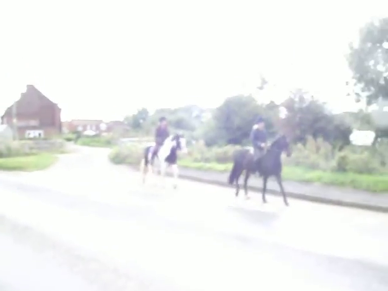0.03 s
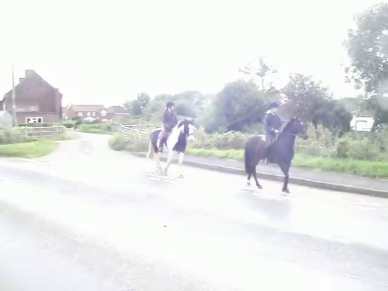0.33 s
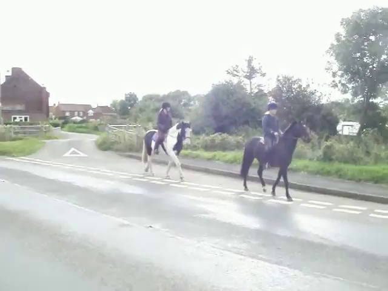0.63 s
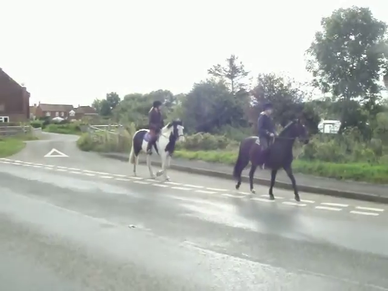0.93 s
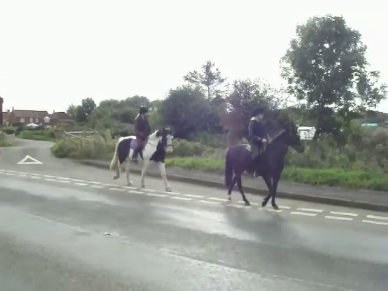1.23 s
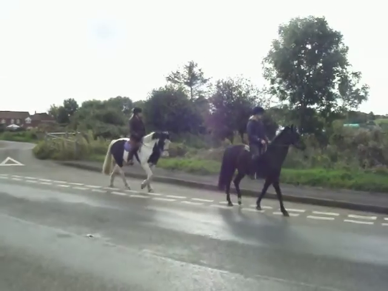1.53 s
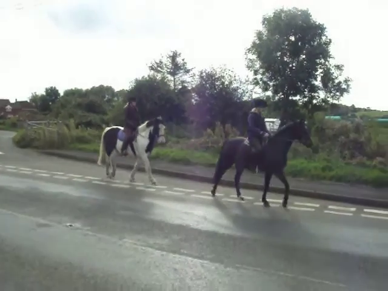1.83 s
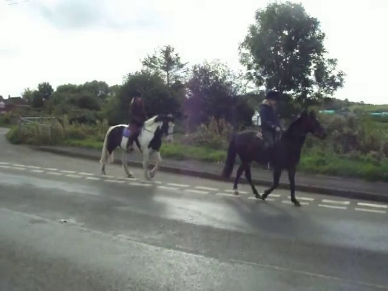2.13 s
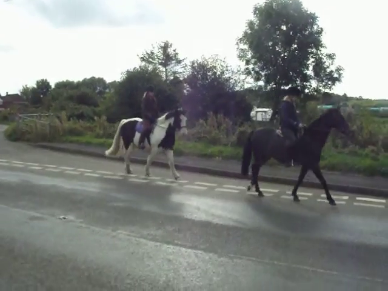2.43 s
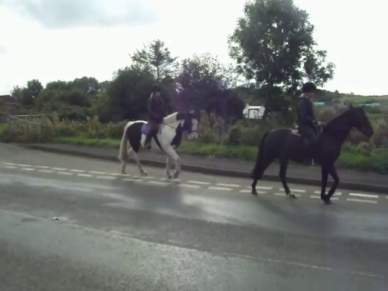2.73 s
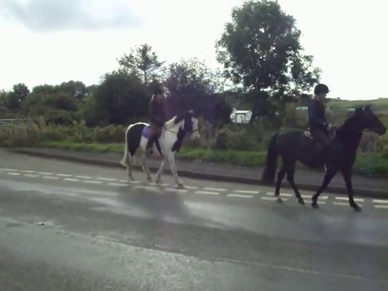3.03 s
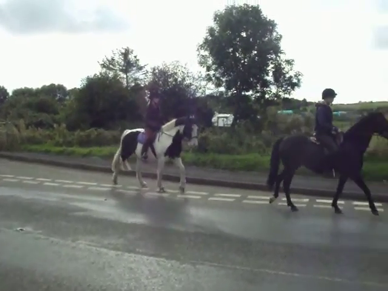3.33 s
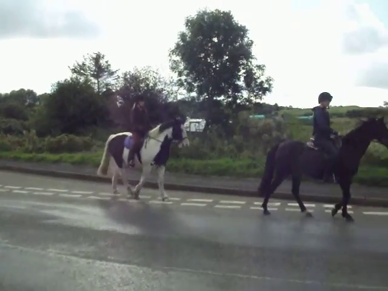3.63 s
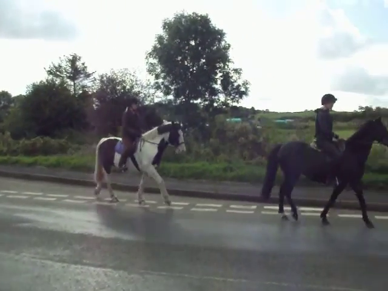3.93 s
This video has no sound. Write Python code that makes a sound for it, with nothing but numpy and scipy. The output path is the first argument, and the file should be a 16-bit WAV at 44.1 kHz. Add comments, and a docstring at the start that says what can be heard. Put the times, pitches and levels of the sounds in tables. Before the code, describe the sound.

Two horses' hooves clop lightly on a paved road a few metres away, about four or five uneven, gritty steps a second throughout. Sharp handling clicks and short rubs sound close to the microphone at the start, around 0.5 seconds and loudest near 1.35 seconds. Light wind rumbles, with soft bumps between 1.3 and 2 seconds. A steady outdoor hiss lies behind, easing slightly toward the end at 4 seconds.

```python
"""A wet paved road, with two horses walking a few metres from a small hand-held camera's microphone.
Each hoof lands toe first: the hollow under it rings with a clop and the shoe cracks on grit.
Early on, sharp little clicks and rubs sound close by, probably fingers shifting on the camera's case.
Behind them lie steady outdoor noise and light wind on the microphone."""
import sys
import numpy as np
from scipy import signal
from scipy.fft import rfft, irfft, next_fast_len
from scipy.io import wavfile

SR = 44100
rng = np.random.default_rng(int(sys.argv[2]) if len(sys.argv) > 2 else 0)


def dump_mix(stems):
    """Bounce the given channels to the path in sys.argv[1] as a 16-bit WAV at rate SR."""
    frames = np.atleast_2d(stems).T  # one column per channel
    limited = np.clip(frames, -1, 1)  # hard clip at full scale
    pcm = np.round(limited * 32767).astype(np.int16)
    wavfile.write(sys.argv[1], SR, pcm)


N = 176400
EVENT_SIZE = 8192   # samples in one hoof fall or click


def hooves():
    """A few metres off, toe, sole and heel land in turn; road and hedge throw some of the sound back."""
    # Each row: sole contact in seconds, relative clop level in dB, hollow pitch in Hz, relative crack
    # level in dB, hollow t60 in seconds, heel delay in seconds, heel and toe in dB against the sole.
    hoof_falls = [(0.2015, -18, 797, -16.5, 0.019, 0.0067, -8.5, -2),
                  (.4677, -19.5, 760, -10.5, 0.028, .0055, -13, -30),
                  (0.7453, -27, 900, -23.5, 0.019, .005, -7, -5),
                  (1.012, -25, 750, -23, 0.019, 0.0027, -3, -3),
                  (1.049, -16.5, 1500, -15.5, .010, 0.0074, 1, -30),
                  (1.2813, -23, 912, -13.5, 0.044, .0056, -5, -13),
                  (1.542, -29, 995, -34, 0.014, 0.0035, -3.5, -7),
                  (1.725, -22.5, 1125, -23.5, .015, 0.0041, -11, -9),
                  (1.8105, -20, 923, -32.5, 0.019, .0055, -14.5, -19.5),
                  (2.026, -43, 950, -22, 0.011, 0.0033, -8, -28),
                  (2.082, -13.5, 724, -15.5, 0.015, .006, -14, -11),
                  (2.362, -25.5, 1090, -27, 0.012, 0.014, -1.5, -10),
                  (2.667, -38, 860, -21.5, 0.01, 0.0023, -8, -18),
                  (2.915, -20, 910, -30, 0.018, 0.0054, -3.5, -27),
                  (2.966, -37, 800, -27.5, 0.0089, 0.0027, -2, -18),
                  (3.126, -41, 1620, -25, .01, 0.016, -1, -28),
                  (3.1792, -25, 680, -19, 0.034, .005, 0, -12),
                  (3.477, -14, 900, -19, 0.028, .0056, -8, -12),
                  (3.621, -22.5, 953, -24.5, 0.0064, 0.0043, -15, -10),
                  (3.745, -23.5, 530, -25, 0.0078, 0.0052, -11, -15)]
    toe_lead_s, grit_t60_s = .0048, .033
    scatter_db, scatter_t60_s = -11.5, .062
    out = np.zeros(N)
    for s, clop_db, hz, crack_db, t60, heel_s, heel_db, toe_db in hoof_falls:
        toe = from_db(toe_db) * tap(0)
        heel = from_db(heel_db) * tap(toe_lead_s + heel_s)
        contacts = toe + tap(toe_lead_s) + heel
        grit = np.roll(dying_noise(grit_t60_s), int(toe_lead_s * SR))
        step = from_db(clop_db + .5) * hollow_clop(contacts, grit, hz, t60)
        step += from_db(crack_db + 2.5) * shoe_crack(contacts, grit)
        scatter = signal.fftconvolve(step, dying_noise(scatter_t60_s))[:EVENT_SIZE]
        add(out, s - toe_lead_s, from_db(scatter_db) * scatter - step)
    return out


def hollow_clop(contacts, grit, hz, t60):
    """The hollow under the hoof rings in two modes and radiates little treble."""
    force = contacts + from_db(-6) * grit
    hollow = ring(force, hz, t60) + from_db(-9) * ring(force, hz * 1.18, t60=.015)
    radiated = np.diff(hollow, prepend=0) * SR / (2 * np.pi * hz)
    return lowpass(radiated, hz=1500)


def shoe_crack(contacts, grit):
    """The shoe strikes the tarmac and crushes grit."""
    # Spectrum of the strike. Each row: frequency in Hz, relative level in dB.
    spectrum = [(100, -10.5), (330, -1.5), (520, -9), (800, -2.5), (1400, 1.5), (2100, -1.5), (2750, 2),
                (3200, -5.5), (3750, -24), (5500, -36)]
    tap_peak = np.abs(colour(tap(0), spectrum)).max()
    return colour(contacts + from_db(-2) * grit, spectrum) / tap_peak


def case_clicks():
    """Right by the microphone, each slip of a finger snaps the case, with a dull thud and a short rub."""
    # Each row: start in seconds, relative level in dB, pitch as a ratio, gain of the low modes in dB.
    clicks = [(.001, -6.5, 1, -29), (.0048, -4.5, 0.87, -9.5), (.0085, -11.5, 1, -1.5),
              (0.015, -16, 0.9, -12), (0.017, -26, 1.14, -11), (0.067, -22, 1, -10),
              (0.097, -27.5, 0.93, 3), (.362, -21, 0.87, -2), (0.5007, -9, 1.01, -8),
              (0.5979, -17, 1.09, -4), (.611, -18, 0.95, 5.5), (0.629, -23, 0.87, 5),
              (0.646, -20, 1.15, -6), (.658, -16, 1.06, 1), (0.871, -23, 0.97, 2), (.894, -21, 1.15, -7),
              (1.244, -20, 1, 2), (1.250, -22, 1.2, 9.5), (1.347, -1.5, 1.007, -2), (1.361, -15, 1, 0),
              (1.366, -16, 1, 1.5), (1.385, -13, .92, -2.5), (1.3914, -10, .98, 1.5),
              (1.4054, -15, 1.26, 3)]
    rub_db, thud_db, thud_hz = -11, -16, 450
    out = np.zeros(N)
    for s, db, pitch, low_db in clicks:
        force = tap(0) + from_db(rub_db) * dying_noise(t60=.02)
        thud = from_db(thud_db) * signal.lfilter([1], [1, -np.exp(-2 * np.pi * thud_hz / SR)], force)
        add(out, s, from_db(db + 3.5) * (case_ring(force, pitch, low_db) + thud))
    return out


def case_slides():
    """Sliding fingers feed tiny uneven slips into the case's modes and rumble through its body."""
    # Each row: start in seconds, length in seconds, friction level in dB.
    slides = [(0, 0.12, -39.5), (0.581, 0.082, -36), (1.225, 0.032, -34), (1.297, 0.11, -34)]
    slips = rng.standard_normal(N) ** 3
    friction = rms_one(case_ring(slips, pitch=1.063, low_db=.5))
    rumble = rms_one(lowpass(rng.standard_normal(N), hz=357))
    envelope = np.zeros(N)
    for s, length, db in slides:
        add(envelope, s, from_db(db) * signal.windows.tukey(int(length * SR), .5))
    return envelope * (friction + from_db(-6) * rumble)


def case_ring(force, pitch, low_db):
    """The small plastic case rings in a few short modes of alternating sign."""
    # Each row: frequency in Hz at a pitch ratio of 1, relative level in dB, t60 in seconds.
    modes = [(1030, -17.5, 0.013), (1502, -13, 0.028), (1900, -12.5, 0.024), (2663, -3.5, .013),
             (2868, -6.5, 0.013), (3130, -11.5, 0.01), (4170, -21.5, 0.0069), (4700, -24.5, 0.0064)]
    low_below_hz = 2200
    out = np.zeros(len(force))
    for k, (hz, db, t60) in enumerate(modes):
        gain = from_db(db + low_db * (hz < low_below_hz))
        out += (-1) ** k * gain * ring(force, hz * pitch, t60)
    return out


def outdoor_noise():
    """A broad background hiss flickers and slowly sinks; a faint narrow band whines steadily in it."""
    # Spectrum of the hiss. Each row: frequency in Hz, relative density in dB.
    spectrum = [(50, -20), (120, -3), (270, -3), (480, -5.5), (720, -5.5), (880, -0.5), (1100, -5),
                (1350, -2), (1680, -4.5), (1870, -4), (2030, -8.5), (2270, -11.5), (2430, -2.5), (2750, -7),
                (3000, -7), (3600, -15.5), (4050, -18), (4600, -16.5), (5100, -20), (5800, -23)]
    # Course of the hiss. Each row: time in seconds, level in dB.
    levels = [(0, -35), (.3, -36.5), (.8, -36.5), (1.3, -36), (1.55, -37), (2.4, -37.5), (3.1, -39),
              (3.65, -38.5), (4, -39)]
    whine_hz, whine_width_hz, whine_db = 2512, 120, -48.5
    flicker_db = .85 * rms_one(ring(rng.standard_normal(N), hz=4.3, t60=.26))
    hiss = from_db(in_time(levels) + flicker_db) * rms_one(colour(rng.standard_normal(N), spectrum))
    whine_t60 = np.log(1000) / (np.pi * whine_width_hz)
    whine = rms_one(ring(rng.standard_normal(N), whine_hz, whine_t60))
    return hiss + from_db(whine_db) * whine


def wind():
    """Light wind rumbles on the microphone, with a few soft bumps."""
    # Spectrum of the rumble. Each row: frequency in Hz, relative density in dB.
    spectrum = [(10, -3), (24, -2), (33, -6), (44, 0), (65, -10), (100, -10.5), (160, -29), (400, -54.5)]
    # Course of the rumble. Each row: time in seconds, level in dB.
    levels = [(0, -42), (1.0, -40.5), (1.4, -37), (2.1, -44), (2.7, -44), (3.4, -43), (4, -45)]
    # Each row: start in seconds, level in dB, frequency in Hz, length in seconds.
    bumps = [(1.337, -28, 63, 0.046), (1.551, -22.5, 42.5, 0.055), (1.892, -27.5, 15, .09)]
    out = from_db(in_time(levels)) * rms_one(colour(rng.standard_normal(N), spectrum))
    for s, db, hz, length in bumps:
        t = np.arange(int(length * SR)) / SR
        swell = from_db(db) * np.sin(np.pi * t / length)
        add(out, s, -swell * np.sin(2 * np.pi * hz * t))
    return out


def tap(s):
    """One unit click, s seconds into an event."""
    return 1. * (np.arange(EVENT_SIZE) == int(max(s, 0) * SR))


def dying_noise(t60):
    """A noise burst of unit energy that falls 60 dB in t60 seconds."""
    decay = np.exp(-np.log(1000) * np.arange(EVENT_SIZE) / SR / t60)
    burst = rng.standard_normal(EVENT_SIZE) * decay
    return burst / np.linalg.norm(burst)


def ring(x, hz, t60):
    """One mode: a unit click starts a sine of height 1 that falls 60 dB in t60 seconds."""
    radius = from_db(-60 / (max(t60, .001) * SR))
    angle = 2 * np.pi * hz / SR
    return signal.lfilter([0, np.sin(angle)], [1, -2 * radius * np.cos(angle), radius ** 2], x + 1e-18)


def colour(x, spectrum):
    """Minimum-phase filter that follows a spectrum of (Hz, dB) points."""
    size = next_fast_len(2 * len(x))
    hz, db = np.transpose(spectrum)
    bin_hz = np.arange(size // 2 + 1) * SR / size
    log_gain = np.log(from_db(np.interp(np.log(bin_hz + 1), np.log(hz), db)))
    cepstrum = irfft(log_gain, size)
    cepstrum[1:size // 2] *= 2   # folded forward, so nothing sounds ahead of a strike
    cepstrum[size // 2 + 1:] = 0
    return irfft(rfft(x, size) * np.exp(rfft(cepstrum)), size)[:len(x)]


def lowpass(x, hz):
    """Roll off the treble at 12 dB an octave."""
    return signal.sosfilt(signal.butter(2, hz, fs=SR, output="sos"), x)


def from_db(db):
    """Decibels to gain."""
    return 10 ** (np.asarray(db) / 20)


def rms_one(x):
    """Scale to rms 1."""
    return x / np.sqrt(np.mean(x ** 2) + 1e-20)


def in_time(rows):
    """Join (seconds, value) points into a curve at every sample."""
    return np.interp(np.arange(N) / SR, *np.transpose(rows))


def add(out, s, sound):
    """Mix a sound in at s seconds."""
    start = max(int(s * SR), 0)
    out[start:start + len(sound)] += sound[:max(N - start, 0)]


def scene():
    """Horses, handling and background all reach one microphone."""
    return (hooves() + case_clicks() + case_slides() + outdoor_noise() + wind())[None]


def record(dry):
    """The camera cuts the treble steeply; the hardest click overloads it and spills above the cut."""
    treble_stop_hz, spill_stop_hz, overload = 6500, 16900, .76
    narrow = signal.sosfilt(signal.cheby2(12, 60, treble_stop_hz, fs=SR, output="sos"), dry)
    clipped = np.clip(narrow, -overload, overload)
    return signal.sosfilt(signal.cheby2(12, 60, spill_stop_hz, fs=SR, output="sos"), clipped)


dry = scene()
out = record(dry)
dump_mix(out)
```